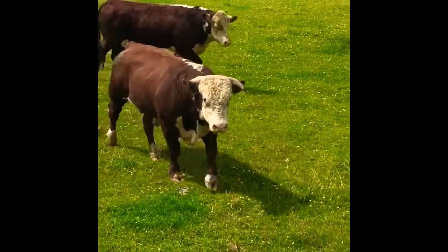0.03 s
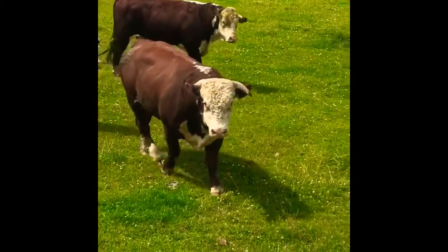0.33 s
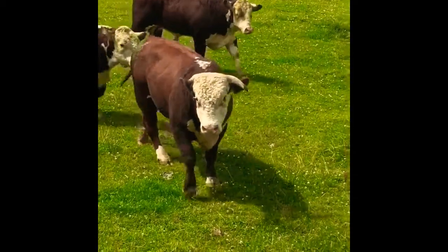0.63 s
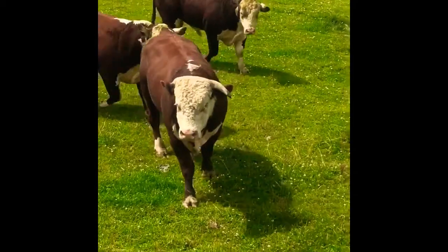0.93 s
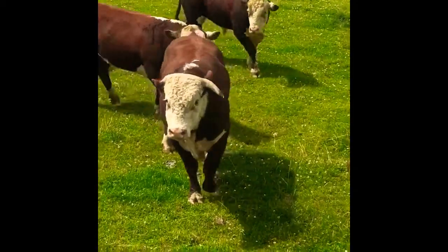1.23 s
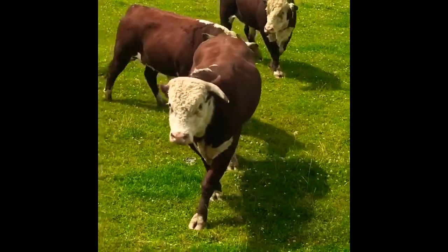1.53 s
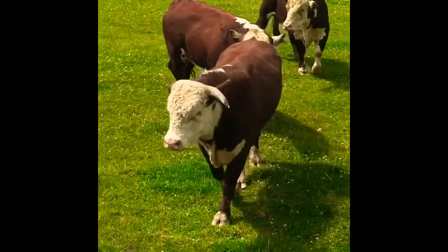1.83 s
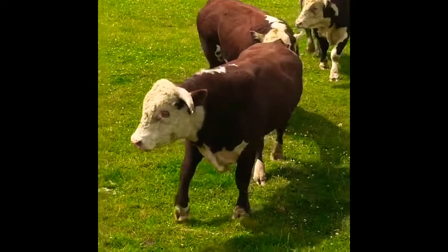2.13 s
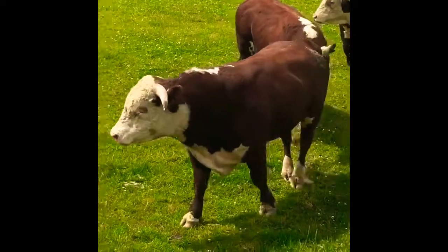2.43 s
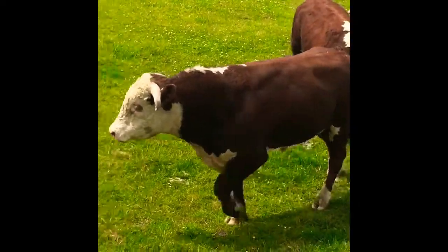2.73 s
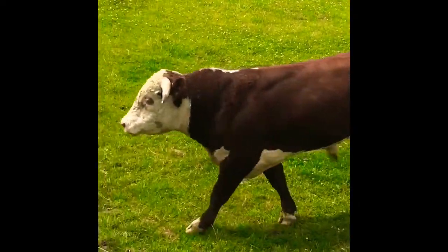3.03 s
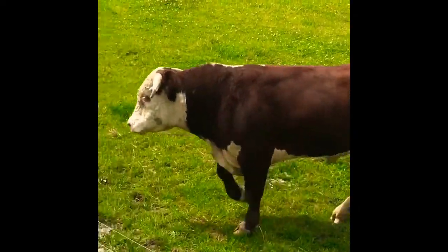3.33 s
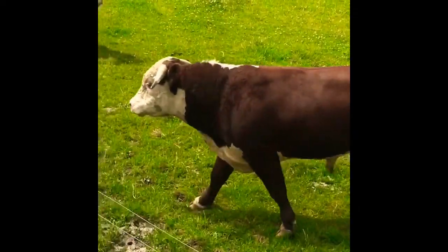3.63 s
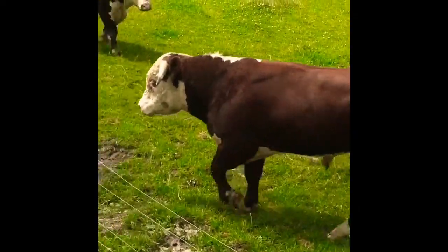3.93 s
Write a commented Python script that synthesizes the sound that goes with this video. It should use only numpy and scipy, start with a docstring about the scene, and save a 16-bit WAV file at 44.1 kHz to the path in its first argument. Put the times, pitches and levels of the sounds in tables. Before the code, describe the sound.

Hooves of cattle brush through pasture grass near the microphone, faint at first under dull wind buffets. Later the rustling gets crisper, with small cracks and a single knock, over a quiet open field and thin, faraway bird chirps.

```python
"""Hooves swish through grass close by: cattle walk a pasture, stalks snap and scrape, a hoof knocks.
Low wind rumbles on the microphone; its eddies break into dull, thudding buffets.
Behind lie the soft hush of the open field and the thin whistles of a far bird."""
import sys
import numpy as np
from scipy import signal
from scipy.fft import rfft, irfft, next_fast_len
from scipy.io import wavfile
from scipy.ndimage import uniform_filter1d, map_coordinates

SR = 44100
rng = np.random.default_rng(int(sys.argv[2]) if len(sys.argv) > 2 else 0)


def output_pcm(signal):
    """Save a mono or channel-first signal as 16-bit PCM at the path in sys.argv[1].

    Samples are clipped to [-1, 1] before scaling.
    """
    pcm = np.clip(np.atleast_2d(signal).T, -1, 1) * 32767
    wavfile.write(sys.argv[1], SR, np.round(pcm).astype(np.int16))


N = 176400

# Spectra. Each row: frequency in Hz, density in dB.
FIELD_SPECTRUM = [(300, 7), (600, 4), (1000, -1.5), (1500, -5.5), (2300, -15), (4100, -15.5), (4900, -28),
                  (5700, -18.5), (9000, -26), (15500, -23)]
RUMBLE_SPECTRUM = [(22, -29.5), (42, -7.5), (62, -0.5), (95, -10.5), (150, -15), (260, -29), (450, -42.5),
                   (1500, -91.5)]
SWIRL_SPECTRUM = [(30, 2.5), (70, 3.5), (120, 1), (200, -5.5), (330, -7.5), (500, -22), (900, -38),
                  (2000, -65)]
STALK_SPECTRUM = [(600, -40), (1900, 8.5), (4000, 2.5), (7500, 2.5), (11000, -5.5), (15500, -20.5)]
GRASS_SPECTRUM = [(100, -59), (400, -28.5), (1000, -2), (1750, 2.5), (2400, 0), (3600, 0), (4900, -3.5),
                  (9500, -8.5), (10700, -11.5), (15500, -15)]
# Bird whistles. Each row: start in seconds, first and last pitch in Hz, level in dB.
BIRD_CHIRPS = [(.40, 5100, 4700, -68), (1.565, 3900, 3300, -65), (1.83, 4800, 3700, -60.5),
               (2.16, 3350, 3200, -63), (2.28, 4200, 5000, -65), (3.82, 4100, 4600, -60.5),
               (3.89, 3700, 4400, -61)]
# Wind strength. Each row: time in seconds, relative level in dB.
WIND_CURVE = [(0.0, -33), (.42, -41), (.58, -45), (.82, -38.5), (1.1, -40.5), (1.35, -47.5), (1.7, -38),
              (2.3, -39.5), (2.56, -33.5), (2.92, -35.5), (3.07, -50.5), (3.13, -36), (3.3, -34),
              (3.62, -31.5), (4.0, -31.5)]
# Turbulence. Each row: centre in seconds, nominal half width in seconds, relative level in dB.
WIND_SWIRLS = [(.2, 0.03, -32), (0.254, 0.019, -24.5), (0.307, 0.01, -19), (.365, 0.012, -23.5),
               (0.477, 0.013, -33), (1.068, 0.02, -35.5), (1.535, 0.024, -21.5), (1.67, 0.028, -39.5),
               (2.028, 0.025, -21.5), (2.101, 0.031, -27.5), (2.834, 0.026, -26.5), (3.011, 0.014, -23),
               (3.189, 0.0083, -26.5), (3.331, 0.0061, -30), (3.425, 0.015, -29), (3.806, 0.021, -28)]
# Deep eddies. Each row: centre in seconds, envelope peak in dB.
WIND_PUFFS = [(.28, -18), (1.529, -8.5), (1.613, -17), (2.027, -5.5), (2.468, -17), (2.519, -18.5),
              (2.625, -18.5), (3.708, -14.5), (3.88, -16.5), (3.943, -15)]
# Pressure jumps. Each row: start in seconds, gain in dB, cutoff in Hz.
WIND_THUDS = [(0.242, -10.5, 900), (.248, -12.5, 760), (0.295, -17, 600), (.477, -21, 437),
              (1.481, -27, 1140), (1.523, -12.5, 1000), (1.539, -12, 520), (1.562, -22.5, 1060),
              (1.99, -14, 494), (2.017, -13, 1000), (2.03, -8, 670), (2.055, -11, 1010), (2.077, -15, 870),
              (2.096, -13.5, 700), (2.838, -21, 460), (2.998, -13, 418), (3.007, -21, 780),
              (3.211, -18.5, 390), (3.435, -16.5, 426), (3.518, -20.5, 385), (3.807, -21, 710)]
# Stem scrapes. Each row: centre in seconds, half width in seconds, level in dB, pitch in Hz.
STEM_RUBS = [(1.619, 0.017, -46.5, 1046), (3.064, .028, -48.5, 3445), (3.391, 0.028, -55.5, 1443),
             (3.458, 0.034, -57, 2913), (3.485, 0.01, -54.5, 1705)]
# Breaking stalks. Each row: start in seconds, peak in dB, tilt in dB per octave.
STALK_SNAPS = [(1.265, -41, -5), (1.678, -33, 10), (2.073, -38, 3), (2.595, -34.5, 1), (2.606, -31, -1.5),
               (2.7478, -29, -3), (3.02, -33, -8), (3.189, -34, 11), (3.199, -37, 17), (3.21, -25, 16.5),
               (3.22, -29.5, -6), (3.889, -35.5, 8.5), (3.963, -33, 4)]
# Hard contacts. Each row: start in seconds, peak in dB, pitch in Hz.
HOOF_KNOCKS = [(2.746, -42, 2120), (3.1244, -24, 1490)]
# Hoof resonances. Each row: ratio to the pitch, level in dB, T60 in seconds.
HOOF_MODES = [(.77, -5.5, 0.067), (.93, 13, 0.0084), (1.1, 7, .03), (1.3, -5, 0.024)]
# Legs brushing grass. Each row: peak time and length in seconds, level in dB, tilt in dB per octave.
LEG_SWISHES = [(0.22, 0.048, -55, -0.5), (0.316, 0.012, -48, -1.5), (0.708, 0.011, -55, 6),
               (0.968, 0.04, -56, 6), (1.135, 0.043, -48, -15.5), (1.23, 0.093, -51.5, -13),
               (1.236, 0.033, -54, 2.5), (1.692, 0.034, -49.5, 7.5), (1.894, 0.043, -51, -17.5),
               (2.071, 0.041, -60.5, 2), (2.425, 0.3, -55.5, -1), (2.601, 0.043, -50, 3.5),
               (2.755, 0.012, -46, -0.5), (2.88, 0.032, -52.5, 4), (3.072, 0.085, -45.5, 0.5),
               (3.211, 0.053, -40, 0.5), (3.236, 0.013, -32.5, 5.5), (3.379, 0.052, -47, 10),
               (3.436, 0.013, -47, 10.5), (3.463, 0.056, -52.5, -4.5), (3.742, 0.038, -50.5, 0.5),
               (3.88, 0.18, -55.5, 2), (3.894, 0.011, -45, 0), (3.952, 0.032, -46.5, 4.5)]


def amp(db):
    """Decibels to gain."""
    return 10 ** (np.asarray(db) / 20)


def unit(x):
    """Scaled to rms 1."""
    return x / np.sqrt(np.mean(x ** 2) + 1e-20)


def clock():
    """Time of every sample."""
    return np.arange(N) / SR


def wobble(rate):
    """A smooth random curve, rate knots a second."""
    return map_coordinates(rng.standard_normal(2048), [clock() * rate], mode="wrap")


def filtered(x, response):
    """x times a response of frequency."""
    m = next_fast_len(len(x) + 4096)
    return irfft(rfft(x, m) * response(np.fft.rfftfreq(m, 1 / SR)), m)[:len(x)]


def coloured(x, spectrum, tilt_db=0):
    """x with a spectrum, tilted per octave, at rms 1."""
    f, db = np.transpose(spectrum)

    def response(hz):
        octaves = np.log2(np.maximum(hz, f[0]) / f[0])
        return amp(np.interp(np.log(hz + 1), np.log(f), db) + tilt_db * octaves)
    return unit(filtered(x, response))


def evened(x, span_s):
    """x with its slow chance swells levelled out."""
    return x / np.sqrt(np.abs(uniform_filter1d(x ** 2, max(int(span_s * SR), 2))) + 0.0011)


def add(track, s, sound):
    """Mix a sound in at time s."""
    i = max(round(s * SR), 0)
    track[i:i + len(sound)] += sound[:max(N - i, 0)]


def field(level_db=-52.5):
    """Soft, slowly drifting hush of open land."""
    return amp(level_db + wobble(4.3)) * coloured(rng.standard_normal(N), FIELD_SPECTRUM)


def bird(chirp_s=0.065, blur_hz=220, tail_s=0.018):
    """Thin gliding whistles, blurred by distance."""
    out, t = np.zeros(N), np.arange(16384) / SR
    for s, start_hz, end_hz, db in BIRD_CHIRPS:
        progress = np.clip(t / chirp_s, 0, 1)
        hz = start_hz + (end_hz - start_hz) * progress + blur_hz * wobble(540)[:len(t)]
        note = np.sqrt(np.abs(np.sin(np.pi * progress))) * np.sin(2 * np.pi * np.cumsum(hz) / SR)
        tail = rng.standard_normal(len(t)) * np.exp(-t / tail_s)
        reverb = signal.fftconvolve(note, tail / np.linalg.norm(tail))[:len(t)]
        add(out, s, amp(db) * (note + reverb))
    return out


def swirl_envelope(stretch):
    """Swirls as bell curves summed in power, widths scaled by stretch."""
    t = clock()
    power = sum(amp(db) ** 2 * np.exp(-((t - s) / (width_s * stretch)) ** 2)
                for s, width_s, db in WIND_SWIRLS)
    return np.sqrt(power)


def wind(breeze_gain_db=4, wake_gain_db=2.5, swirl_gain_db=0.5):
    """Rumble on the microphone follows wind strength and swells round each brighter swirl."""
    breeze = amp(np.interp(clock(), *np.transpose(WIND_CURVE)) + breeze_gain_db + 3.9 * wobble(18))
    wake = amp(wake_gain_db) * swirl_envelope(stretch=1.43)
    rumble = evened(coloured(rng.standard_normal(N), RUMBLE_SPECTRUM), span_s=0.0443)
    swirls = amp(swirl_gain_db + 2.1 * wobble(110)) * swirl_envelope(stretch=0.89)
    turbulence = evened(coloured(rng.standard_normal(N), SWIRL_SPECTRUM), span_s=0.0192)
    return np.hypot(breeze, wake) * rumble + swirls * turbulence


def puffs(typical_hz=77, half_width_s=0.0076):
    """Single eddies roll over the microphone: a cycle or two of deep pressure."""
    out, t = np.zeros(N), np.arange(-2048, 2048) / SR
    for s, db in WIND_PUFFS:
        hz = typical_hz * amp(rng.standard_normal())
        swing = np.sin(2 * np.pi * (hz * t + rng.random()))
        add(out, s + t[0], amp(db) * swing * np.exp(-(t / half_width_s) ** 2))
    return out


def thuds(swing_hz=162.6, decay_s=0.0035):
    """Pressure jumps at the microphone: a soft edge, one low swing."""
    out, t = np.zeros(N), np.arange(2048) / SR
    push = np.cos(2 * np.pi * swing_hz * t) * np.exp(-t / decay_s)
    for s, db, cutoff_hz in WIND_THUDS:
        low_pass = signal.butter(6, cutoff_hz, fs=SR, output="sos")
        add(out, s, amp(db) * signal.sosfilt(low_pass, push))
    return out


def rubs(fall_oct_per_s=3, width_ratio=0.16):
    """Stems squeak and scrape against a hoof: a narrow, falling noise band."""
    out, t = np.zeros(N), clock()
    for s, width_s, db, hz in STEM_RUBS:
        pitch_hz = hz * 2 ** (-fall_oct_per_s * np.clip(t - s, -2 * width_s, 2 * width_s))
        phase = 2 * np.pi * np.cumsum(pitch_hz) / SR
        band = np.sin(phase) * wobble(width_ratio * hz) + np.cos(phase) * wobble(width_ratio * hz)
        out += amp(db) * np.exp(-((t - s) / width_s) ** 2) * unit(band)
    return out


def snaps(decay_s=0.0011):
    """Stalks break with tiny dry cracks."""
    out, t = np.zeros(N), np.arange(1024) / SR
    for s, db, tilt_db in STALK_SNAPS:
        burst = rng.standard_normal(len(t)) * np.exp(-t / decay_s)
        crack = coloured(burst, STALK_SPECTRUM, tilt_db)
        add(out, s, amp(db) * crack / np.abs(crack).max())
    return out


def knocks(rebound_s=0.00428, rebound_db=-3.5, click_db=-2, click_cutoff_hz=2090,
           click_decay_s=0.0019, attack_s=0.00018):
    """A hoof hits something hard, clicks, rings and rebounds once."""
    out, t = np.zeros(N), np.arange(4096) / SR
    for s, db, hz in HOOF_KNOCKS:
        for delay_s, gain_db in [(0, 0), (rebound_s, rebound_db)]:
            ring = sum(amp(mode_db - 60 * t / t60_s)
                       * np.sin(2 * np.pi * (hz * ratio * t + rng.random()))
                       for ratio, mode_db, t60_s in HOOF_MODES)
            noise = filtered(rng.standard_normal(len(t)), lambda f: 1 / (1 + (f / click_cutoff_hz) ** 4))
            click = amp(click_db) * unit(noise) * np.exp(-t / click_decay_s)
            knock = (ring + click) * (1 - np.exp(-t / attack_s))
            add(out, s + delay_s, amp(db + gain_db) * knock / np.abs(knock).max())
    return out


def blades(samples, clicks_per_s=330, spread_db=4, clicks_db=-3):
    """Small clicks of grass blades over smooth brushing noise."""
    chance, size = rng.random(samples), rng.standard_normal(samples)
    clicks = (chance < clicks_per_s / SR) * np.sign(size) * amp(spread_db * np.abs(size))
    return rng.standard_normal(samples) + amp(clicks_db) * unit(clicks)


def tuft(ripple_db=1.5):
    """Frequency response of one tuft: gentle random peaks and dips."""
    knots = rng.standard_normal(128)
    return lambda hz: amp(ripple_db * map_coordinates(knots, [np.sqrt(hz) / 2], mode="wrap"))


def grass(rise_share=0.46, decay_share=0.81, crunch_db=2, crunch_per_s=260, stir_db=-64):
    """Each brush of a leg swells and dies; the rest of the herd keeps the grass stirring."""
    out, t = np.zeros(N), np.arange(SR) / SR
    for peak_s, length_s, db, tilt_db in LEG_SWISHES:
        start_s = max(peak_s - 0.5, 0)
        age = (t + start_s - peak_s) / length_s
        envelope = np.exp(-np.where(age < 0, (age / rise_share) ** 2, age / decay_share))
        crunch = unit(amp(crunch_db * wobble(crunch_per_s)[:SR]))  # blades give way in clumps
        brush = coloured(filtered(blades(SR), tuft()), GRASS_SPECTRUM, tilt_db)
        add(out, start_s, amp(db) * envelope * crunch * brush)
    stir = amp(stir_db + 3.44 * wobble(16)) * coloured(blades(N), GRASS_SPECTRUM, tilt_db=0.5)
    return out + stir


def scene():
    """All sources at one microphone in open air."""
    return (wind() + puffs() + thuds() + grass() + rubs() + snaps() + knocks() + bird() + field())[None]


def record(dry):
    """Cuts the deepest bass and the highest treble."""
    bottom_hz, top_hz = 28, 15900
    low_cut = signal.butter(2, bottom_hz, "high", fs=SR, output="sos")
    return filtered(signal.sosfilt(low_cut, dry[0]), lambda hz: hz < top_hz)[None]


dry = scene()
out = record(dry)
output_pcm(out)
```